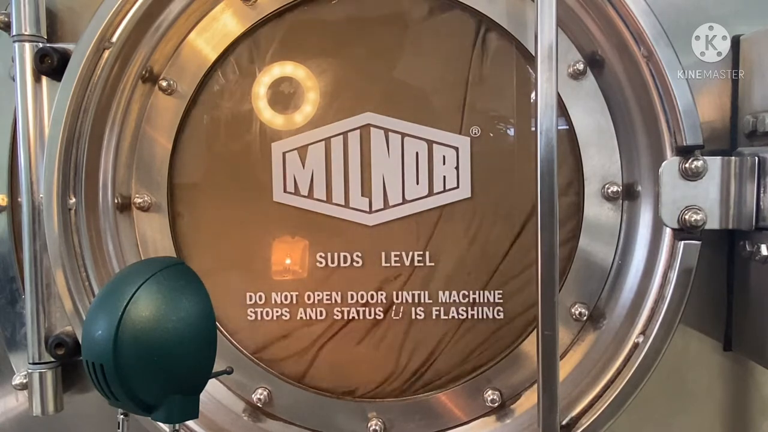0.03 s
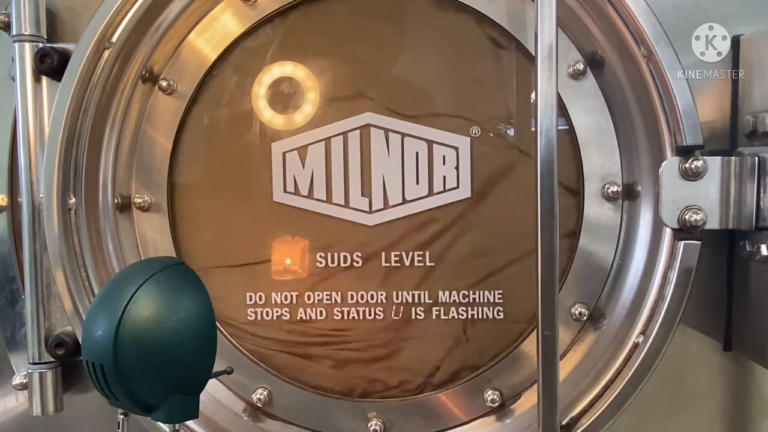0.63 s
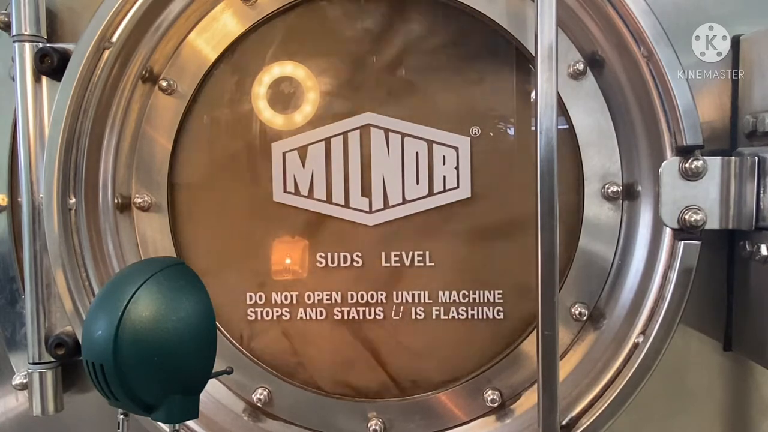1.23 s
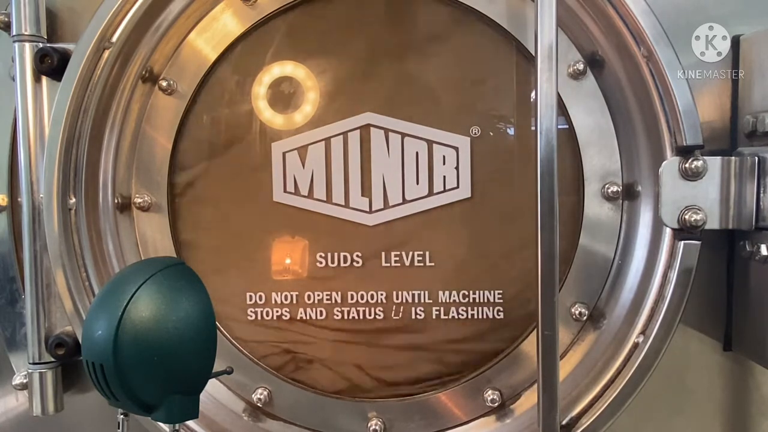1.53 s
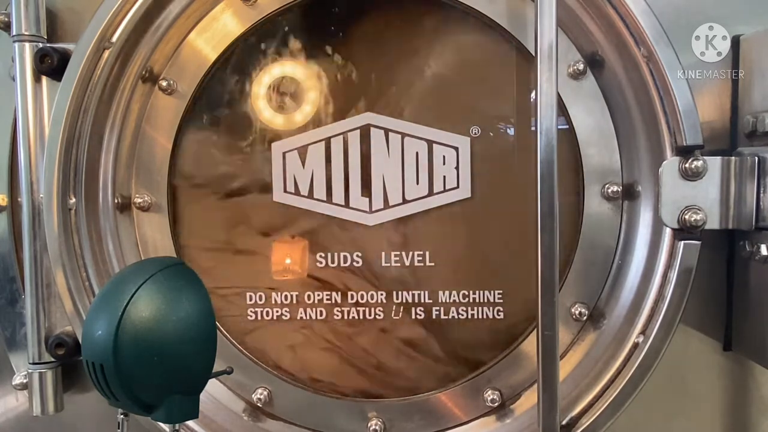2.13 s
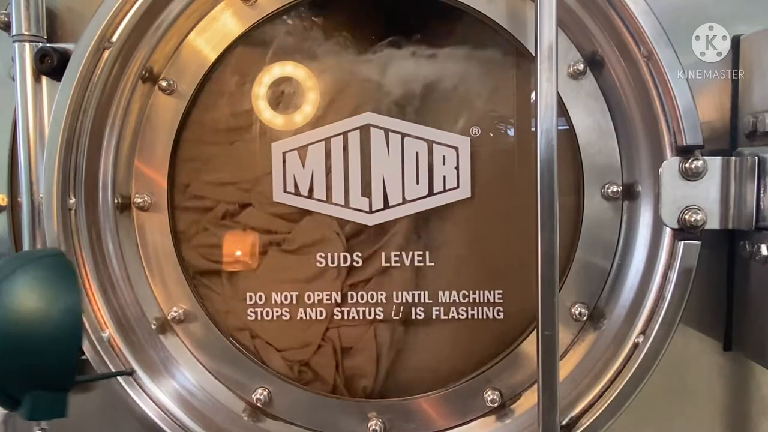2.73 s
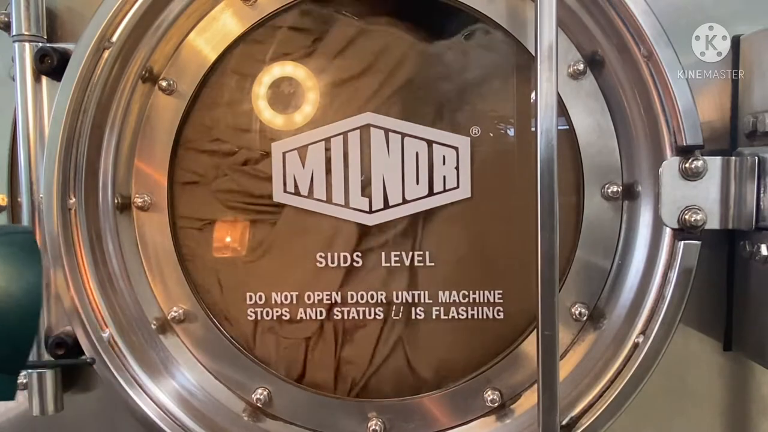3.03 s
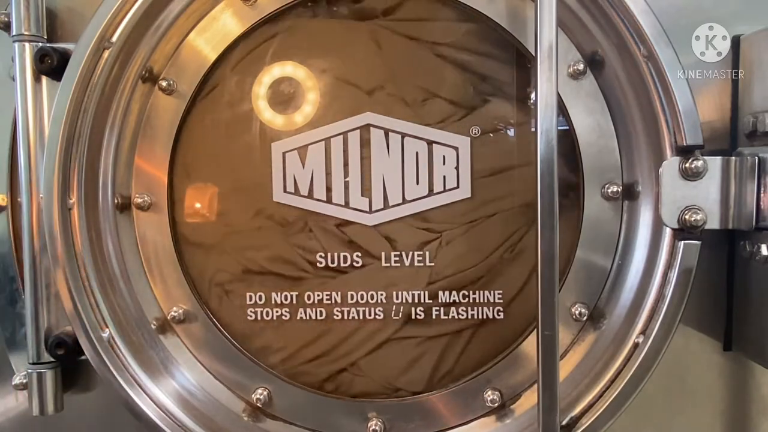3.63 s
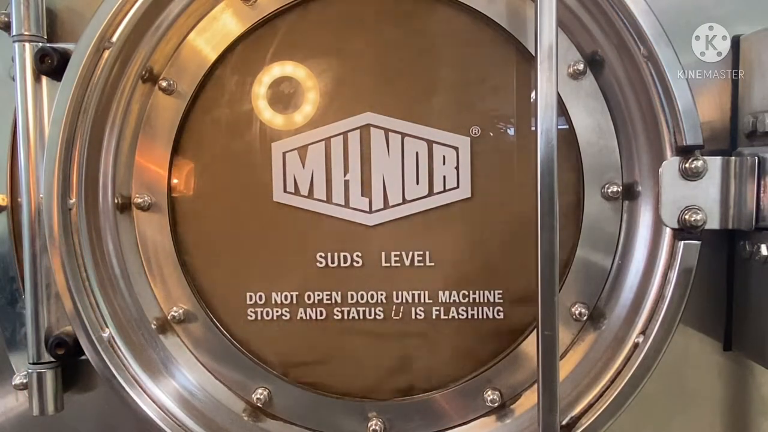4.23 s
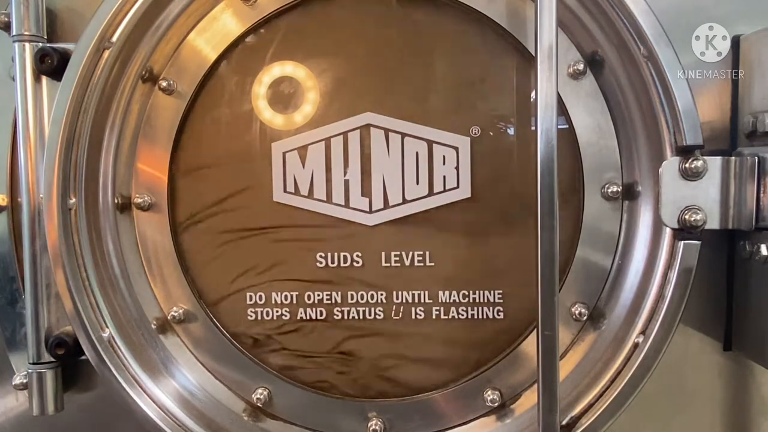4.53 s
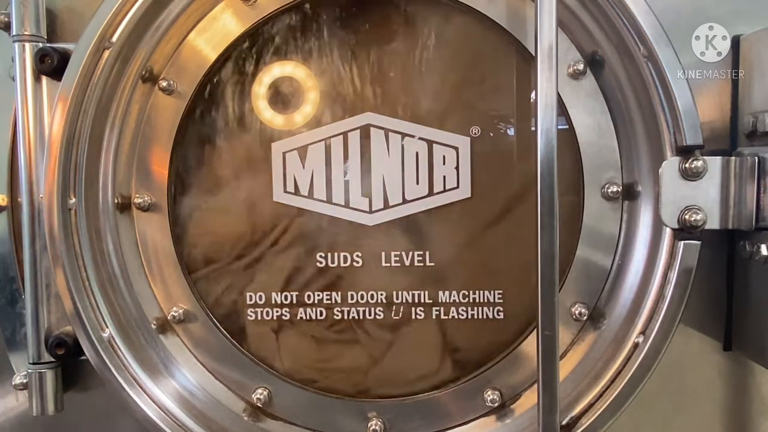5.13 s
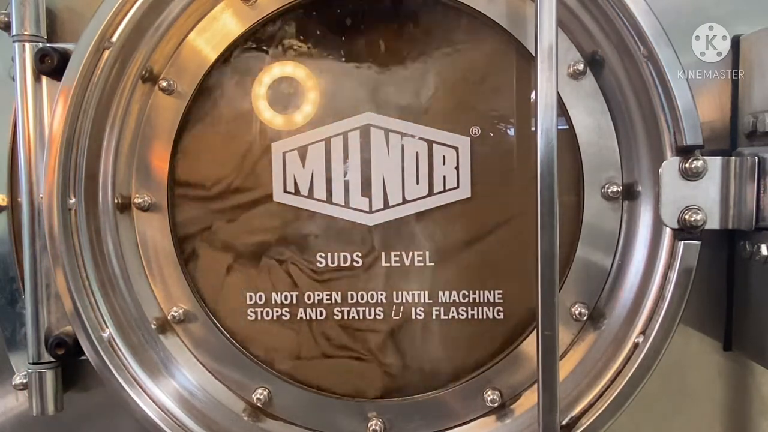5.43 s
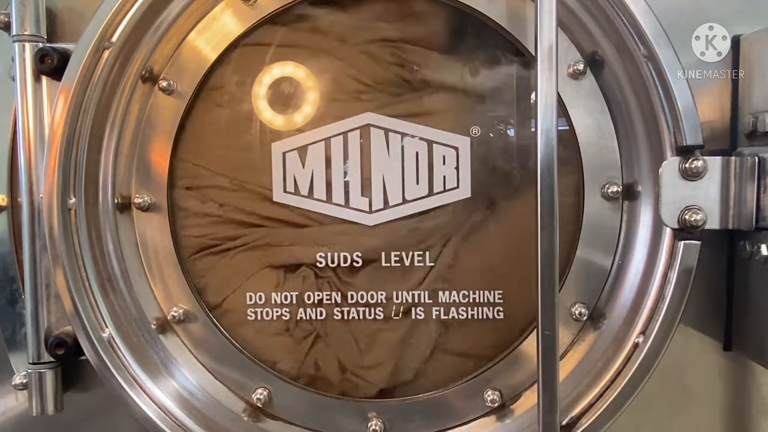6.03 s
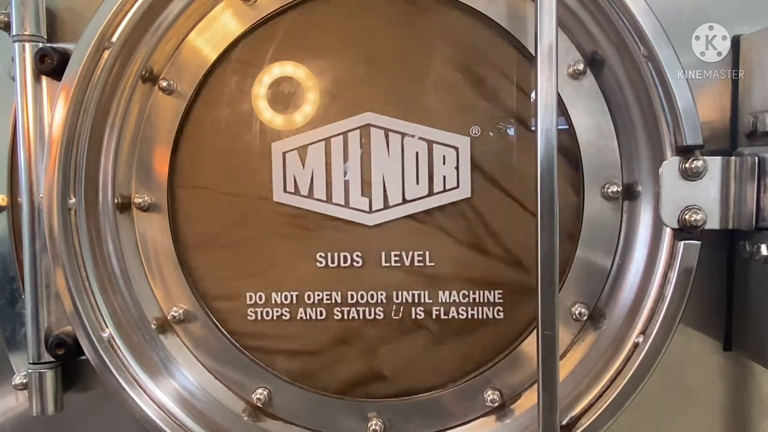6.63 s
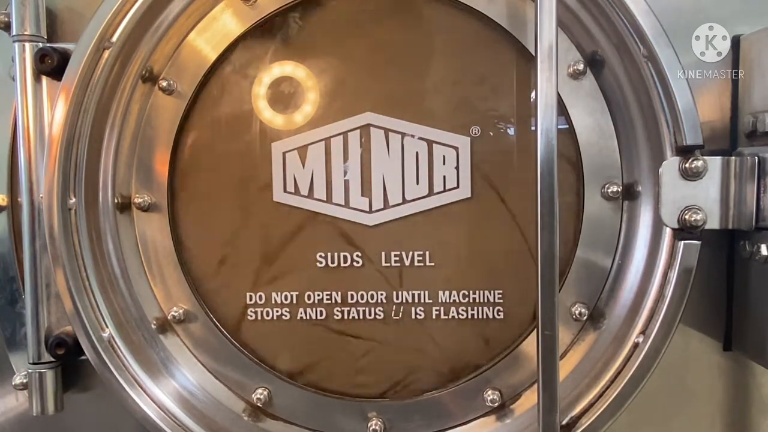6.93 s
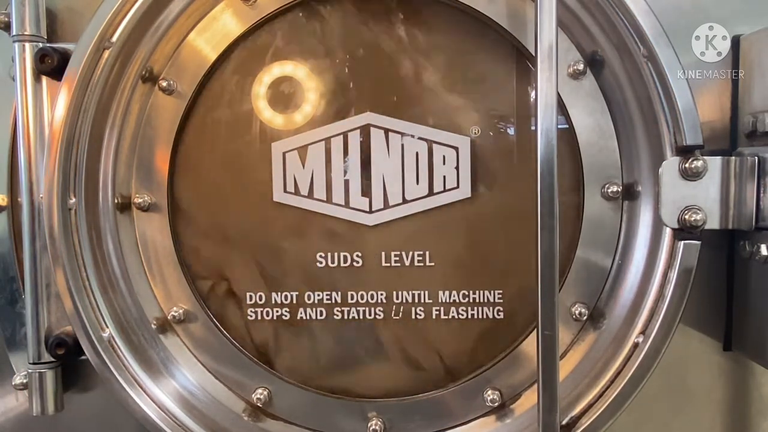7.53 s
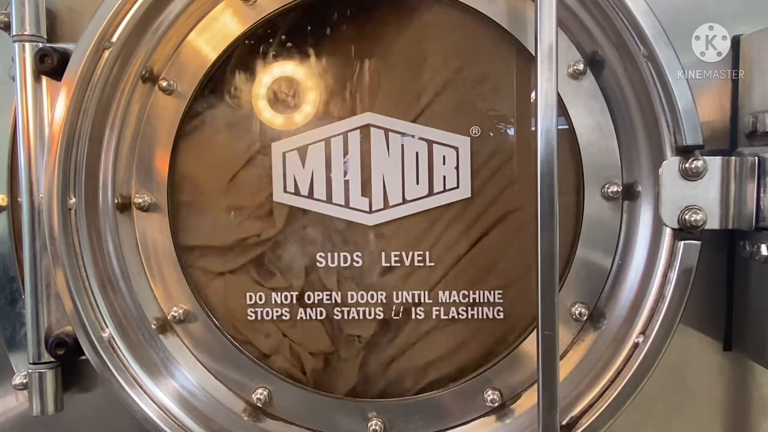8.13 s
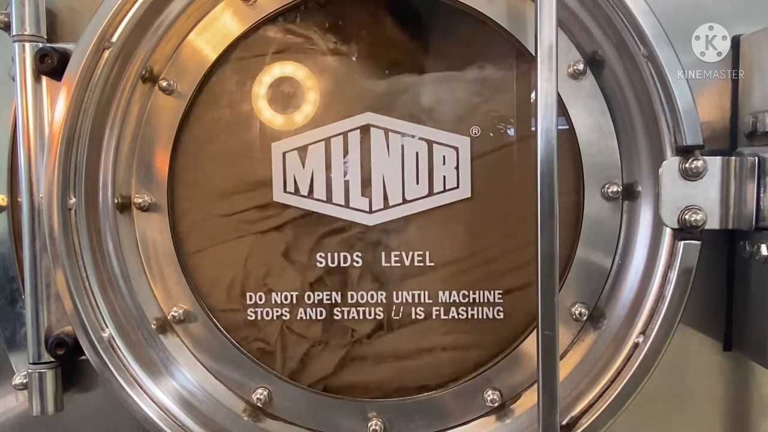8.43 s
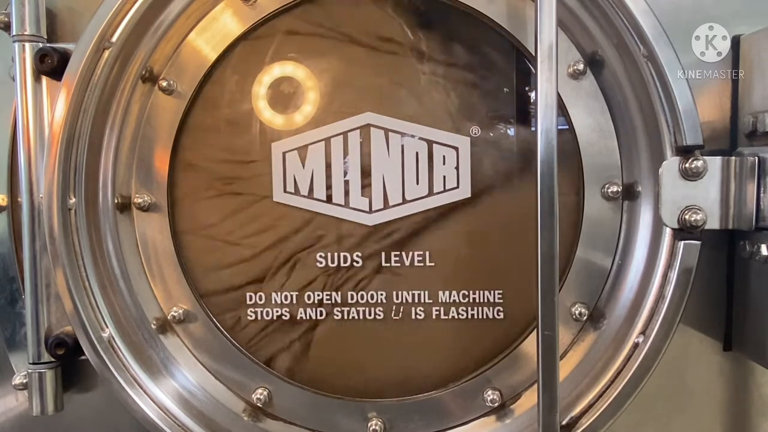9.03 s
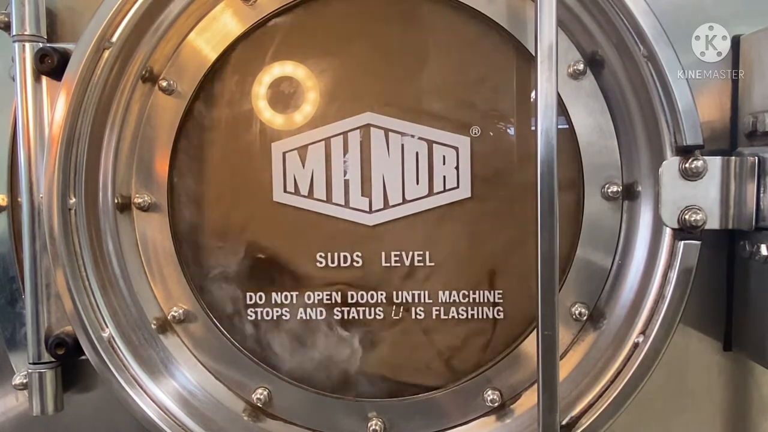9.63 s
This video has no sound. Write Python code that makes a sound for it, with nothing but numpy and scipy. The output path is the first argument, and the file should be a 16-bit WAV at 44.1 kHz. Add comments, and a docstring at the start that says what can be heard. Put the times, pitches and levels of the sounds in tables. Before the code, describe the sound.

Close to the door of a big washing machine in a laundry, a deep, pulsing motor hum and rumble run without a break, along with faint hiss and a thin high whine. Inside the drum, wet cloth keeps falling with soft thuds, and water churns, gurgles and splashes behind the glass. Something small clinks twice near the start, followed by a few scattered clusters of light rustling and crisp ticks.

```python
"""A large front-loading washer tumbles a wet load, heard close to its glass door in a hard-walled laundry.
Two motors drone and throb against each other and the mains hum, while the rocking tub sways their notes.
The drum rumbles, wet cloth thuds, and water sloshes and slaps as the load falls.
Behind it are a steady airy hiss and the thin whine of the drive.
A few light rustles, ticks and a small double clink sound close by."""
import sys
import numpy as np
from scipy import signal
from scipy.fft import rfft, irfft
from scipy.io import wavfile
from scipy.ndimage import uniform_filter1d

SR = 44100
rng = np.random.default_rng(int(sys.argv[2]) if len(sys.argv) > 2 else 0)


def generate_wav(sig):
    """Save sig (samples, or channels by samples) to the path in sys.argv[1] as 16-bit PCM at SR."""
    pcm = np.round(np.clip(np.atleast_2d(sig).T, -1, 1) * 32767).astype(np.int16)
    wavfile.write(sys.argv[1], SR, pcm)


N = 432180
T = np.arange(N) / SR
# each swing of the tub speeds up and slows the motors: by how much, and how late (share of a swing)
SWAY_HZ, SWAY_LAG = 0.22, 0.29
# how far the left wave runs ahead of the right: pitch_hz, lead_radians
LEFT_LEAD = [(0, 0), (230, 0), (350, -.2), (550, -1.7), (780, -2), (1100, -1.1), (1800, -1.1), (2800, 1.3),
             (4200, .5), (6600, 0), (7600, -1.4), (8500, -3.1), (10200, -6.2), (12100, -9.4),
             (14000, -12.5), (15600, -15.7)]
# how much louder the left side is: pitch_hz, boost_db
LEFT_BOOST = [(60, .3), (120, 1.8), (250, 1.1), (400, .3), (1400, .6), (2200, 3), (3500, 2.5), (5300, 4.3),
              (7000, 1.5), (8700, 0)]


def amp(db):
    """Turns decibels into a number to multiply by."""
    return 10 ** (np.asarray(db) / 20)


def unit(x):
    """Scales a signal to an average (rms) level of 1."""
    return x / np.sqrt(np.mean(x ** 2) + 1e-20)


def at_pitch(table, hz):
    """Looks up a table's value at a pitch, sliding smoothly between its rows."""
    pitches, values = np.transpose(table)
    return np.interp(np.log(hz + 1), np.log(pitches + 1), values)


def add(mix, start_s, sound):
    """Mixes a sound in at its start time."""
    part = mix[round(start_s * SR):][:len(sound)]
    part += sound[:len(part)]


def drift(per_s, count=16):
    """A slow random wobble of average size 1, with up to per_s swings a second."""
    hz = np.geomspace(per_s / 10, per_s, count)[:, None]
    waves = np.sin(2 * np.pi * (hz * T[::256] + rng.random((count, 1)))) / np.sqrt(hz)
    return unit(np.interp(T, T[::256], waves.sum(0)))


def swells(rows, rise_share, rest_db):
    """Level in dB of rounded swells over a resting level; rows are start_s, length_s, level_db."""
    power = amp(rest_db) ** 2
    for start, length, db in rows:
        progress = np.interp(T, [start, start + length * rise_share, start + length], [0, .5, 1])
        power = power + (amp(db) * np.sin(np.pi * progress)) ** 2
    return 10 * np.log10(power)


def stereo(a, b, hz):
    """Blends two unrelated spectra into left and right: alike in the bass, offset in time higher up."""
    # how alike the two sides are: pitch_hz, likeness (0 to 1)
    likeness = [(45, .99), (100, .88), (130, .65), (250, .9), (350, .16), (500, .45), (1600, .2),
                (2800, .25), (5000, .28), (7000, .13), (8500, .8), (10000, .7), (11000, .93)]
    same = at_pitch(likeness, hz)
    tilt = amp(at_pitch(LEFT_BOOST, hz) / 2)
    right = (same * a + np.sqrt(1 - same ** 2) * b) * np.exp(-1j * at_pitch(LEFT_LEAD, hz))
    return np.array([a * tilt, right / tilt])


def colour(pair, spectrum, patchy_db, size=1024, patch_size=(9, 9)):
    """Shapes two noises into a stereo sound of level 1, with shifting louder and softer patches."""
    frames = dict(nperseg=size, noverlap=size * 3 // 4)
    hz, _, spectra = signal.stft(pair, SR, **frames)
    a, b = spectra.transpose(0, 2, 1)
    blur = np.outer(*map(np.hanning, patch_size))
    patches = unit(signal.fftconvolve(rng.standard_normal(a.shape), blur, "same"))
    shaped = stereo(a, b, hz) * amp(at_pitch(spectrum, hz) + patchy_db * patches)
    _, sound = signal.istft(shaped.transpose(0, 2, 1), **frames)
    return unit(sound[:, :N])


def patter(per_s, spread_db):
    """Two streams of tiny hits; more spread makes a few of them stand out."""
    size = amp(spread_db * np.minimum(rng.exponential(1, (2, N)), 4))
    return unit(size * rng.choice([-1, 1], (2, N)) * (rng.random((2, N)) < per_s / SR))


def tone(turns, hz, db):
    """A pure note following a running count of cycles; hz only sets how left and right differ."""
    tilt = amp(at_pitch(LEFT_BOOST, hz) / 2)
    angle = 2 * np.pi * turns
    left, right = np.cos(angle), np.cos(angle - at_pitch(LEFT_LEAD, hz))
    return np.sqrt(2) * amp(db) * np.array([left * tilt, right / tilt])


def burst(centre_hz, octaves, rise_s, decay_s):
    """A short dying puff of noise around one pitch, with peak 1."""
    t = np.arange(4096) / SR
    hz = np.fft.rfftfreq(len(t), 1 / SR) + 1
    band = np.exp(-.5 * (np.log2(hz / centre_hz) / octaves) ** 2)
    noise = irfft(rfft(rng.standard_normal(len(t))) * band)
    puff = noise * np.exp(-t / decay_s) * (1 - np.exp(-t / rise_s))
    return puff / abs(puff).max()


def echo(sound, fade_s):
    """Hard walls return a short wash of echoes, different on each side, falling 60 dB in fade_s."""
    t = np.arange(SR // 2) / SR
    tail = rng.standard_normal((2, len(t))) * amp(-60 * t / fade_s) * (t > .004)
    return signal.fftconvolve(sound, tail / np.linalg.norm(tail[0]), axes=1)[:, :N]


def rocking(lag=0, swings_per_s=1.393, peak_s=4.785):
    """The tumbling load rocks the tub between -1 and 1; lag delays this by a share of a swing."""
    return np.cos(2 * np.pi * (swings_per_s * (T - peak_s) - lag))


def air():
    """Moving air hisses and rings faintly in the steel casing."""
    # tone colour of the hiss: pitch_hz, relative_db
    hiss_shape = [(300, 0.5), (1000, 6.5), (2000, 3), (2450, 2), (2850, 1.5), (3500, 0.5), (4400, -2.5),
                  (5300, -1.5), (6500, -4.5), (7300, -11), (9200, -4.5), (11000, -13), (12200, -23),
                  (15500, -24)]
    # where the casing rings: pitch_hz, width_hz, boost_db
    casing_rings = [(1990, 51, 4), (2766, 40, 6.5), (2960, 49, 5), (5210, 55, 3.5), (6800, 68, 5)]
    hiss = colour(rng.standard_normal((2, N)), hiss_shape, patchy_db=2.0)
    hz = np.fft.rfftfreq(N, 1 / SR)
    casing = 1 + sum((amp(db) - 1) / (1 + (2 * (hz - pitch) / width) ** 2)
                     for pitch, width, db in casing_rings)
    return amp(-41 + 0.12 * drift(7.0)) * irfft(rfft(hiss) * casing, N)


def rustle(rise_share=0.39):
    """Light rustles close by: a swish of tiny crackles, with a few crisper ones standing out."""
    # each rustle: start_s, length_s, swish_db, crackle_db
    rustles = np.array([(1.5, 0.36, -53, -58), (2.2, 0.67, -49, -60), (2.85, 0.99, -52, -59),
                        (3.756, 0.23, -43.5, -48), (4.15, 0.2, -51, -54), (6.328, 0.12, -48, -52),
                        (6.47, 0.11, -43.5, -53), (8.97, 0.18, -39.5, -54), (9.15, 0.12, -48, -57),
                        (9.39, 0.14, -47, -60)])
    # tone colour of the swish: pitch_hz, relative_db
    swish_shape = [(800, -31), (3000, 3.5), (5500, 3), (7500, 1.5), (10500, 5.5), (13000, -10),
                   (16000, -19)]
    # tone colour of the crisp crackles: pitch_hz, relative_db
    crackle_shape = [(3000, -22), (8000, -19), (11000, -4), (14500, 3), (16000, -2)]
    waver_db = -4 * drift(2.2)
    swish = colour(patter(per_s=2500, spread_db=0.0), swish_shape, patchy_db=2.5, size=256)
    crackle = colour(patter(per_s=1100, spread_db=8.0), crackle_shape, patchy_db=2.0, size=256)
    swish_db = swells(rustles[:, :3], rise_share, rest_db=-55.5 + waver_db)
    crackle_db = swells(rustles[:, [0, 1, 3]], rise_share, rest_db=-72 + waver_db)
    return amp(swish_db) * swish + amp(crackle_db) * crackle


def ticks(left_delay_s=0.00034):
    """Single sharp crackles tick among the rustles, reaching the right side first."""
    # each tick: start_s, peak_db, pitch_hz, width_octaves
    crackles = [(3.745, -31, 13500, .25), (3.766, -24, 10000, .4), (3.778, -32, 12000, .35),
                (3.811, -29, 3700, .4), (3.816, -28, 13000, .5), (3.821, -29, 11000, .5),
                (3.856, -24.5, 3350, 0.28), (3.867, -31, 4000, 0.59), (3.868, -24.5, 13000, 0.45),
                (3.875, -30, 11000, .5), (3.900, -28, 6500, .2), (3.905, -29, 14000, .2),
                (3.913, -25, 11000, .5), (6.450, -25, 12500, 0.61), (6.489, -29.5, 10000, .2),
                (6.507, -28, 9500, .18), (6.515, -27, 10600, 0.15), (6.515, -22, 3800, 0.6),
                (6.527, -27, 9000, 0.44), (8.930, -28.5, 13500, .3), (9.182, -33, 11500, .3),
                (9.210, -30, 9800, .15), (9.422, -24, 7500, 1.0), (9.452, -30, 5500, .2)]
    right = np.zeros(N)
    for start, db, hz, width in crackles:
        add(right, start, amp(db) * burst(hz, octaves=width, rise_s=0.00045, decay_s=0.001))
    return np.array([np.interp(T - left_delay_s, T, right), right])


def clink(roughness=0.33, click_db=-5, right_db=-9):
    """Something small and hard strikes twice on the left: a dry click and a very short ring."""
    # each strike: start_s, level_db
    strikes = [(2.33, -28), (2.3425, -21.5)]
    # the notes it rings with: pitch_hz, relative_db, fade_s (time to fall 60 dB)
    notes = [(3300, 6.5, 0.014), (4670, -2.5, .015), (5100, -4, .013)]
    left, t = np.zeros(N), np.arange(4096) / SR
    for start, db in strikes:
        add(left, start, amp(db + click_db) * burst(3200, octaves=0.57, rise_s=0.0007, decay_s=0.0016))
        for hz, note_db, fade_s in notes:
            scrape = 1 + roughness * unit(uniform_filter1d(rng.standard_normal(len(t)), size=50))
            ring = amp(db + note_db - 60 * t / fade_s) * np.sin(2 * np.pi * hz * t)
            add(left, start, ring * scrape * (1 - np.exp(-t / 0.00089)))
    return np.array([left, amp(right_db) * left])


def whine():
    """The drive and fan whine thinly; tiny shifts in timing blur the highest notes most."""
    # each note: pitch_hz, level_db, waver_db
    notes = [(1668, -58.5, 2.0), (2769, -76, 3.0), (6061, -73.5, 2.5), (6666, -66.7, 2.5), (8881, -74, 2.5),
             (13620, -78, 2.5)]
    out = np.zeros((2, N))
    for hz, db, waver_db in notes:
        jitter_s = 3e-5 * drift(7.5)
        out += tone(hz * (T + jitter_s), hz, db + waver_db * drift(4.3))
    return out


def panel(pitch_hz=581.95, wander_hz=0.3, waver_db=2.8):
    """A panel sings along near ten times the motors' speed; its pitch and strength sway with the tub."""
    # how its loudness slowly changes: time_s, level_db
    levels = [(0, -50), (0.6, -45.5), (1.9, -46.3), (3.0, -52), (4.6, -50.5), (5.7, -50.5), (7.5, -50),
              (9.8, -50.5)]
    hz = pitch_hz + 10 * SWAY_HZ * rocking(SWAY_LAG) + wander_hz * drift(1.198)
    db = np.interp(T, *np.transpose(levels)) + waver_db * drift(4.0)
    return (1 + 0.3 * rocking(lag=0.065)) * tone(np.cumsum(hz) / SR, pitch_hz, db)


def bubbles(per_s, cycles, rise, sizes=28):
    """Bubbles of many sizes each ring briefly and rise a little in pitch."""
    out, t = np.zeros((2, N)), np.arange(SR // 12) / SR
    for hz in np.geomspace(350, 2600, sizes):
        age = t * hz / cycles
        glide = 1 + rise * np.minimum(age, 5)
        ring = np.exp(-age) * np.sin(2 * np.pi * hz * t * glide) / np.sqrt(hz)
        for when, strength, side in rng.random((round(per_s * N / SR / sizes), 3)):
            add(out[0], when * T[-1], ring * strength ** 2 * np.sqrt(side))
            add(out[1], when * T[-1], ring * strength ** 2 * np.sqrt(1 - side))
    return unit(out)


def water(rise_share=0.29):
    """Churning water, muffled by the door, swells quickly and drains slowly each time the load falls."""
    # each fall of the load: start_s, length_s, slosh_db, spray_db
    falls = np.array([(0.048, 0.34, -40.5, -45.5), (0.72, 0.42, -43, -44), (1.28, 0.32, -40, -54),
                      (1.525, 0.46, -37, -46), (1.917, 0.3, -41, -44), (2.397, 0.17, -44, -52),
                      (3.3, 0.53, -45, -45), (3.7, 0.52, -39.5, -56), (4.042, 0.45, -36.5, -43),
                      (4.418, 0.33, -37, -43.5), (4.843, 0.31, -43, -41), (4.994, 0.45, -37, -44),
                      (5.862, 0.4, -41, -48), (6.625, 0.27, -42, -46), (6.81, 0.18, -36.5, -44),
                      (7.592, 0.5, -35.5, -42.5), (8.5, .3, -55, -48), (9.2, 0.52, -39, -49),
                      (9.58, 0.22, -38.5, -45)])
    # tone colour of the muffled water: pitch_hz, relative_db
    slosh_shape = [(100, -34), (250, -9), (450, 1), (700, -0.5), (1000, -4), (1600, -8.5), (2000, -14),
                   (2500, -17.5), (4000, -20), (8000, -32.5), (16000, -45)]
    # tone colour of its spray: pitch_hz, relative_db
    spray_shape = [(400, -2.5), (1100, -8), (1900, 0), (2600, -17.5), (4500, -20), (12000, -31)]
    waver_db = -0.2 * drift(9.6)
    slosh = colour(patter(per_s=5000, spread_db=2.5), slosh_shape, patchy_db=1.76)
    gurgle = amp(-8.5) * bubbles(per_s=160, cycles=11.9, rise=0.0243)
    spray = colour(patter(per_s=1400, spread_db=5.0), spray_shape, patchy_db=2.0, size=512)
    slosh_db = swells(falls[:, :3], rise_share, rest_db=-40 + waver_db)
    spray_db = swells(falls[:, [0, 1, 3]], rise_share, rest_db=-51 + waver_db)
    return amp(slosh_db) * (slosh + gurgle) + amp(spray_db) * spray


def slaps():
    """Single slaps of water and wet cloth ring briefly inside the drum."""
    # each slap before its echo: start_s, peak_db, pitch_hz
    hits = [(0.19, -41, 1800), (0.245, -37, 374), (1.001, -30.5, 1200), (1.63, -32, 500), (2.495, -28, 473),
            (2.936, -26, 790), (4.141, -25, 467), (4.264, -33, 1770), (5.04, -32, 2180), (5.089, -31, 480),
            (5.125, -33, 1100), (5.943, -26, 360), (6.872, -27, 446), (7.711, -32, 479),
            (7.742, -26.5, 355), (7.835, -33, 1050)]
    out = np.zeros(N)
    for start, db, hz in hits:
        add(out, start, amp(db) * burst(hz, octaves=0.24, rise_s=0.0022, decay_s=0.0083))
    return out + amp(-3.5) * echo(out[None], fade_s=0.29)


def drum(rumble_db=-29, thud_s=0.017, sag=0.093, overtone=1.47, overtone_db=-5):
    """The rolling wet load makes the cabinet rumble; heavy lumps land with thuds that sag in pitch."""
    # each lump of wet cloth landing: start_s, level_db, pitch_hz
    lumps = [(0.08, -28, 91), (2.63, -25, 150.5), (3.345, -25, 221), (3.798, -21, 134), (5.495, -30, 246.3),
             (5.884, -24, 150), (6.37, -23.5, 149), (7.69, -29, 148), (8.161, -31, 226), (9.22, -26.5, 231)]
    # tone colour of the rumble: pitch_hz, relative_db
    rumble_shape = [(15, -40), (30, -24), (40, -9), (50, -0.5), (92, 1), (130, -3.5), (147, -1),
                    (166, -6.5), (205, -4.5), (245, -4), (300, -8.5), (400, -14), (700, -21), (2000, -43)]
    thuds, t = np.zeros(N), np.arange(SR // 2) / SR
    push = t / thud_s * np.exp(1 - t / thud_s)
    glide = 1 + sag * (np.exp(-t / thud_s / 2) - .5)
    for start, db, hz in lumps:
        angle = 2 * np.pi * np.cumsum(hz * glide) / SR
        add(thuds, start, amp(db) * push * (np.sin(angle) + amp(overtone_db) * np.sin(overtone * angle)))
    rumble = colour(rng.standard_normal((2, N)), rumble_shape, patchy_db=0.9, size=4096, patch_size=(7, 9))
    return thuds + amp(rumble_db) * rumble


def hum_swell():
    """One pitch of the hum comes up and fades again."""
    # the swell: start_s, length_s, pitch_hz, level_db
    swell = [(3.05, 0.88, 117.5, -29)]
    start, length, hz, db = swell[0]
    turns = hz * T + rng.random() + 0.08 * drift(3.9)
    return tone(turns, hz, swells([(start, length, db)], rise_share=0.52, rest_db=-100))


def motors(first_hz=58.335, second_hz=58.205, mains_hz=60.01):
    """Two motors drift in and out of step and throb against the mains hum; the tub makes them surge."""
    # the motors' notes: speed_multiple, first_db, second_db, waver_db, dip_share (at each tub swing)
    notes = [(1, -25, -29, 0.5, 0), (2, -37, -37.5, -0.9, 0.037), (3, -36.5, -60, 0.5, 0.42),
             (4, -44, -47, 1.0, 0.31), (5, -56.5, -60.5, 5, 0), (6, -53, -65, 2.5, 0.28)]
    # slow rise and fall of the deepest note: time_s, change_db
    deep_changes = [(0, 0.5), (2.65, 0.5), (3.55, -2), (4.05, 2), (4.7, 0), (6.4, -0.5), (7.3, 0),
                    (9.8, 0.2)]
    # the same for the note an octave above: time_s, change_db
    octave_changes = [(0.6, -3), (1.15, 4), (1.7, 0.5), (2.45, -13), (3.6, -1), (4.6, 2.5), (5.2, 3.5),
                      (5.8, 0), (7.5, -1), (9.4, 0)]
    # magnetic hum: mains_multiple, level_db, waver_db
    hum_notes = [(2, -35.5, 1.5), (4, -46.5, 1)]
    opposed_s = 5.35  # the motors are half a turn apart: odd multiples fight, even ones add up
    in_step_s = 4.97  # the mains hum is in step with the motors
    sway = np.cumsum(SWAY_HZ * rocking(SWAY_LAG)) / SR
    sway -= sway.mean()
    first_turns = first_hz * (T - opposed_s) + sway
    second_turns = second_hz * (T - opposed_s) + sway + .5
    mains_turns = mains_hz * (T - in_step_s) + (first_hz + second_hz) / 2 * (in_step_s - opposed_s)
    delay = rng.random(12)  # the cabinet delays each pitch by its own part of a cycle
    slow_db = {1: np.interp(T, *np.transpose(deep_changes)),
               2: np.interp(T, *np.transpose(octave_changes))}
    # part of the first motor's deepest note swings with the tub
    shake = tone(first_turns + delay[1] - .167, first_hz, notes[0][1] + slow_db[1])
    out = .68 * rocking() * shake
    swing = rocking(lag=-0.03)
    for motor, turns in enumerate([first_turns, second_turns]):
        turns = turns + 0.005 * drift(3.0)  # the load tugs at the speed
        for k, *levels_db, waver_db, dip in notes:
            db = levels_db[motor] + waver_db * drift(2.5) + slow_db.get(k, 0)
            out += (1 - dip * swing) * tone(k * turns + delay[k], k * first_hz, db)
    for k, db, waver_db in hum_notes:
        out += tone(k * mains_turns + delay[k], k * mains_hz, db + waver_db * drift(1.6))
    return out


def scene():
    """The washer, its water and the small sounds close by, all together."""
    clicks = ticks() + clink()
    washer = motors() + whine() + panel() + hum_swell() + drum() + water() + slaps()
    return washer + air() + rustle() + clicks + amp(-8) * echo(clicks, fade_s=0.2)


def record(dry, cutoff_hz=15750):
    """Cuts away the very highest treble."""
    low_pass = signal.firwin(511, cutoff_hz, window=("kaiser", 9), fs=SR)
    return signal.oaconvolve(dry, low_pass[None], "same", axes=1)


dry = scene()
out = record(dry)
generate_wav(out)
```